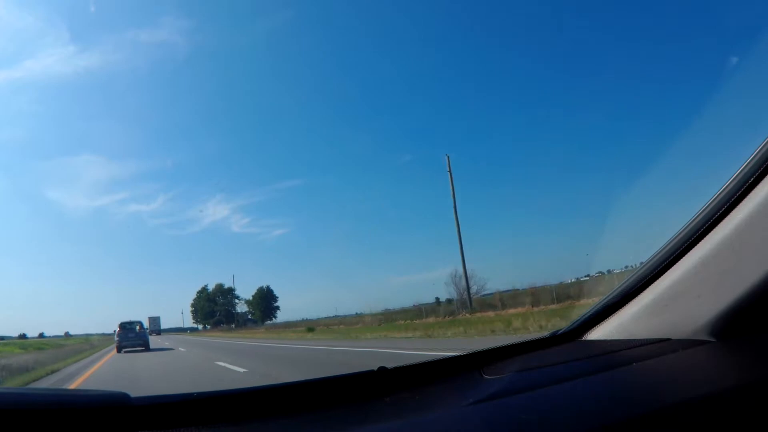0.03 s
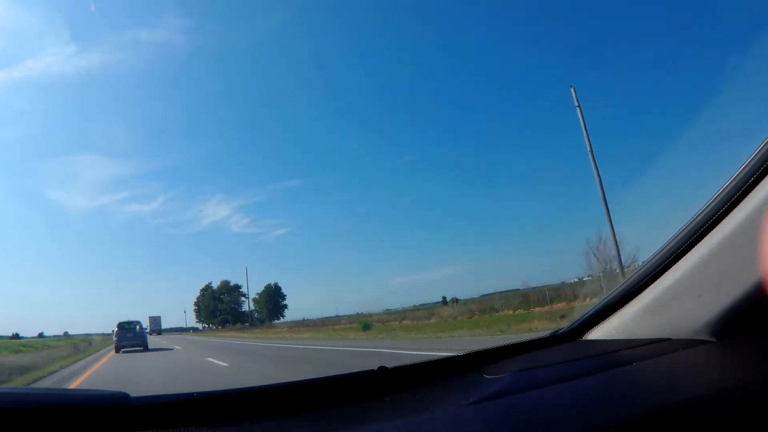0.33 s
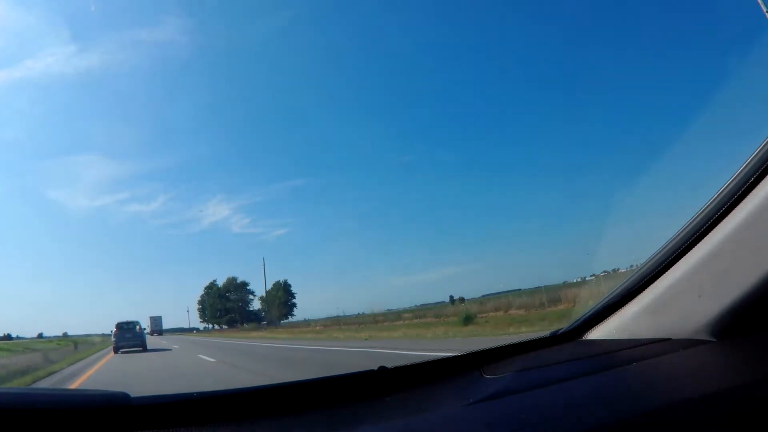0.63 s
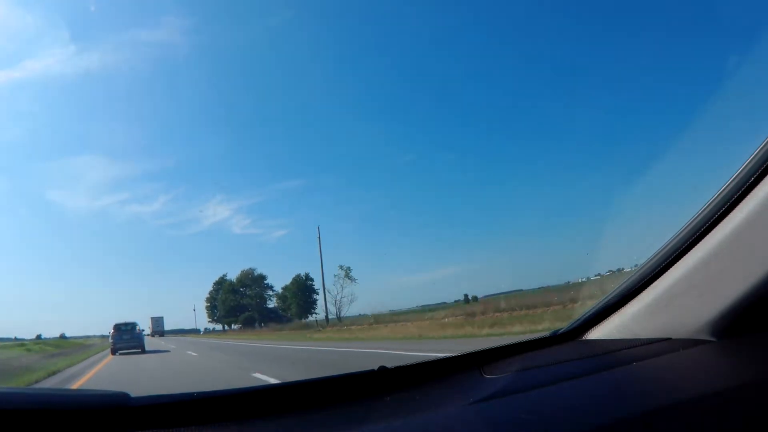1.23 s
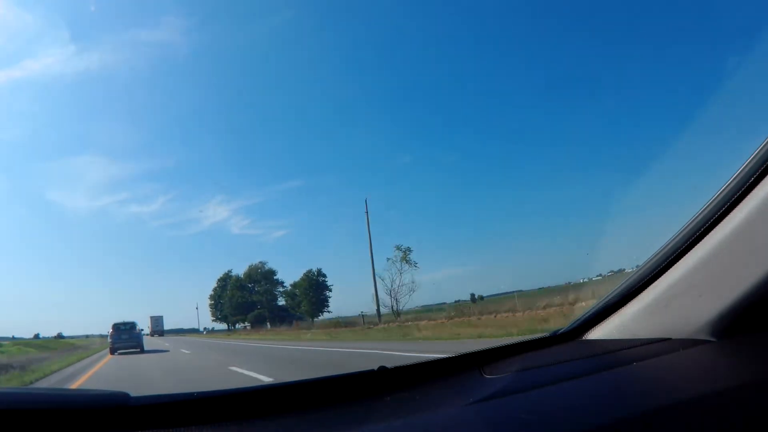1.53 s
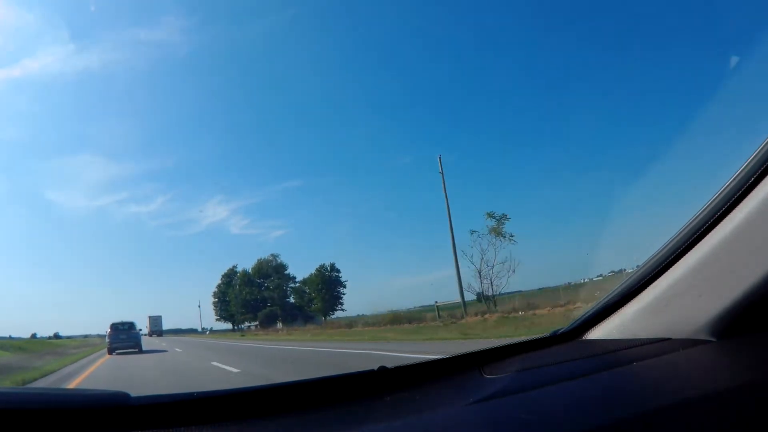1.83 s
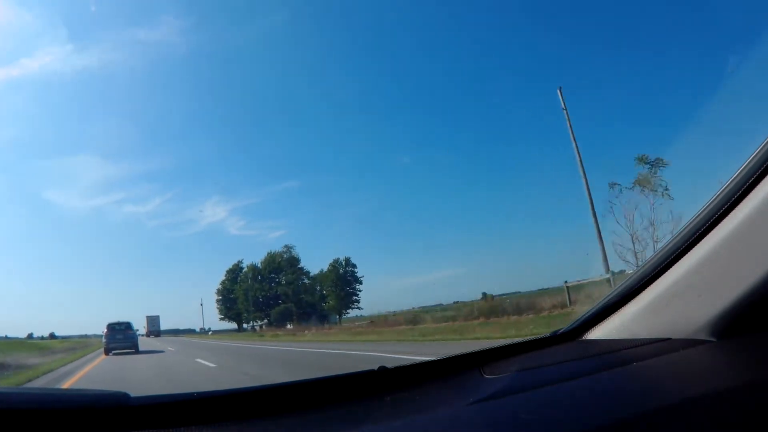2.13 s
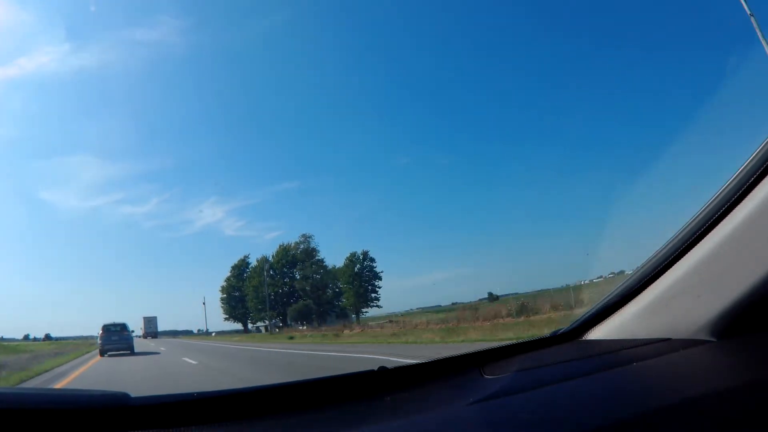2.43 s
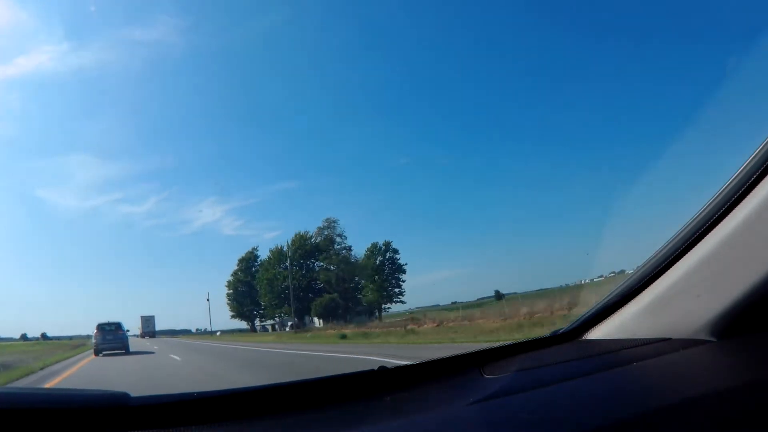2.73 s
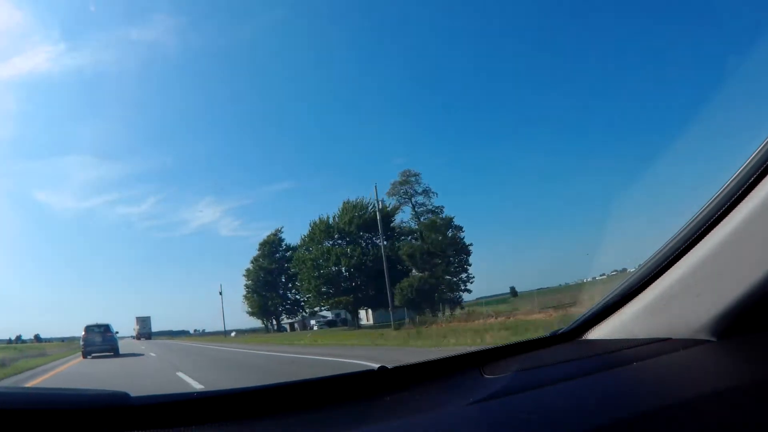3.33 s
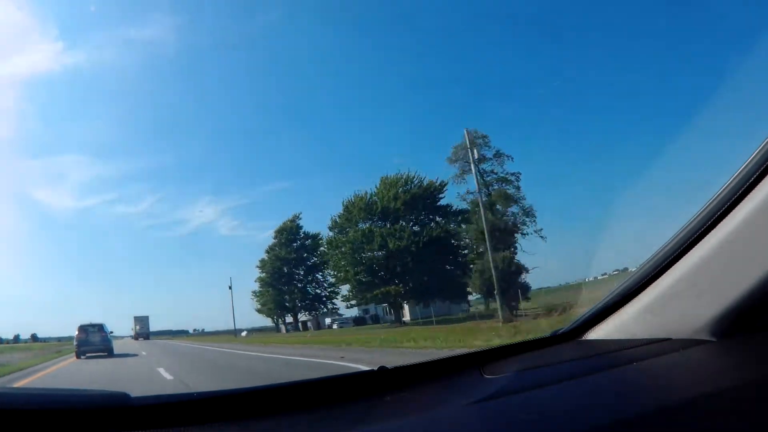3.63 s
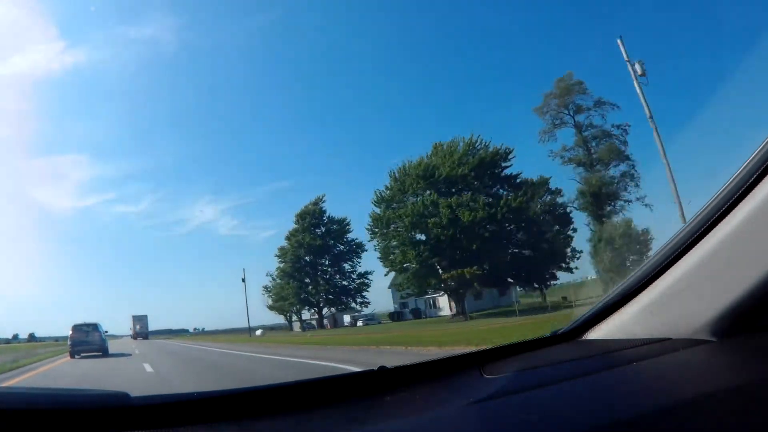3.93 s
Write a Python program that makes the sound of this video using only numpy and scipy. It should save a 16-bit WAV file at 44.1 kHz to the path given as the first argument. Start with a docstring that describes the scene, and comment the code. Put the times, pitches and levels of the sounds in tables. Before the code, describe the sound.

Steady road rumble and engine drone inside a car cruising along a highway.

```python
"""Car cabin at cruising speed

On a country highway the rough surface drives the tyres and body into rumble and roar, and wheels throb.
Periodic firing makes a four-cylinder engine drone; it swells under a short push on the throttle.
Plastic near the dashboard rings once from a knock, then ticks and rustles now and then.
Behind it all, gears whine faintly and turbulent air hisses round the glass."""
import sys
import numpy as np
from scipy import signal
from scipy.fft import rfft, irfft, next_fast_len
from scipy.io import wavfile
from scipy.ndimage import map_coordinates

SR = 44100
rng = np.random.default_rng(int(sys.argv[2]) if len(sys.argv) > 2 else 0)


def wav_record(signal):
    """Record a signal, one row per channel, as 16-bit PCM in the file named by sys.argv[1]."""
    frames = np.transpose(np.atleast_2d(signal))
    bounded = np.clip(frames, -1, 1)
    # unit amplitude maps onto the largest positive 16-bit level
    quanta = np.round(bounded * 32767).astype(np.int16)
    wavfile.write(sys.argv[1], SR, quanta)


N = 176400


def amp(db):
    """Amplitude ratio of a level in decibels."""
    return 10 ** (np.asarray(db) / 20)


def curve(rows):
    """Linear interpolation of (t/s, value) points, one value per sample."""
    return np.interp(np.arange(N) / SR, *np.transpose(rows))


def wobble(rate):
    """Slow random modulation: a spline through `rate` Gaussian values a second."""
    return map_coordinates(rng.standard_normal(512), [np.arange(N) * rate / SR], mode="wrap")


def noise(spectrum, size=N, tilt_db=0):
    """White noise shaped by a spectrum, tilted by tilt_db per octave and scaled to rms 1."""
    octave = np.log2(np.fft.rfftfreq(size, 1 / SR) + 1)
    hz, db = np.transpose(spectrum)
    gain = amp(np.interp(octave, np.log2(hz), db) + tilt_db * (octave - np.log2(4000)))
    shaped = irfft(rfft(rng.standard_normal(size)) * gain, size)
    return shaped / np.sqrt(np.mean(shaped ** 2) + 1e-20)


def strike(t, attack, t60):
    """Envelope of a damped vibration: a quick rise, and a decay of 60 dB in t60 seconds."""
    return (1 - np.exp(-t / attack)) * np.exp(-np.log(1000) * t / t60)


def swell(start, length):
    """Half-sine envelope, zero outside its span."""
    return np.sin(np.pi * np.clip((np.arange(N) / SR - start) / length, 0, 1))


def add(out, start, sound):
    """Superpose a sound on `out`, beginning at `start` seconds."""
    part = out[round(start * SR):][:len(sound)]
    part += sound[:len(part)]


# Spectra of body rumble, panel drumming and tread roar: f/Hz, relative level/dB
RUMBLE_SPECTRUM = [(6, -20), (15, -16), (30, 2.5), (48, -4.5), (68, 4.5), (82, -1), (110, 7.5), (135, 2),
                   (165, 3), (200, -11.5), (260, -10.5), (500, -60.5)]
DRUM_SPECTRUM = [(120, -23.5), (200, 3.5), (255, 0), (300, -4.5), (345, -3.5), (400, -10.5), (600, -17),
                 (1200, -62.5)]
ROAR_SPECTRUM = [(150, -21), (350, -1), (500, 2.5), (680, 0.5), (800, -2), (1000, -4), (1270, -3.5),
                 (1440, -6.5), (1570, -4.5), (1700, -12), (2000, -16), (2350, -17.5), (2750, -22.5),
                 (3150, -32), (4500, -76)]
# Envelopes of the rumble and the drumming: t/s, level/dB
RUMBLE_ENVELOPE = [(0, -34), (.25, -27.5), (.65, -27.5), (1.05, -26.5), (1.4, -30), (1.9, -27.5),
                   (2.2, -28), (2.7, -27), (3.2, -28.5), (3.5, -29), (4, -30.5)]
DRUM_ENVELOPE = [(0, -34.5), (.8, -34.5), (1.4, -34), (1.75, -33), (2.1, -36), (3.1, -33.5), (4, -35)]
ROAR_DB = -35.5

def road():
    """Random forced vibration: the changing surface excites the body, its panels and the tyre tread."""
    rumble = amp(curve(RUMBLE_ENVELOPE) + 0.96 * wobble(8.19)) * noise(RUMBLE_SPECTRUM)
    drum = amp(curve(DRUM_ENVELOPE) + 0.21 * wobble(6)) * noise(DRUM_SPECTRUM)
    roar = amp(ROAR_DB + 0.16 * wobble(3.1) + 0.38 * wobble(24.7)) * noise(ROAR_SPECTRUM)
    return rumble + drum + roar


# Engine speed: t/s, speed/rpm
CRANK_SPEED = [(0.0, 3247.0), (0.5, 3242.0), (1.0, 3234.0), (1.5, 3233.0), (2.1, 3233.0), (2.5, 3241.0),
               (3.0, 3252.0), (3.5, 3262.0), (4.0, 3259.0)]
# Engine load: t/s, throttle (about 0 coasting, about 1 pulling)
ENGINE_LOAD = [(0, -.1), (.5, 0), (1, .05), (1.5, .05), (2.05, .25), (2.3, .9), (2.75, 1), (3.15, 1.1),
               (3.45, .95), (3.65, .45), (4, .2)]

def crank():
    """Rotation is the integral of speed: returns the crank's rpm, its turns so far and the throttle."""
    rpm = curve(CRANK_SPEED)
    turns = np.cumsum(rpm) / (60 * SR)
    return rpm, turns, curve(ENGINE_LOAD)


# Engine orders: multiple of crank speed, relative level coasting/dB, relative level pulling/dB
ENGINE_ORDERS = [(1.0, -58, -44), (2.0, -32.7, -29.3), (3.0, -42, -39), (3.5, -47, -47), (4.0, -43.5, -32),
                 (5.0, -51, -49), (5.5, -50, -55), (6.0, -37.5, -31.5), (7.5, -43, -42.5), (8.0, -51, -39),
                 (8.5, -54, -41.5), (9.0, -55, -49.5), (9.5, -53, -51), (10.0, -70, -49), (10.5, -56, -51),
                 (11.5, -59, -50), (12.5, -58, -52), (13.5, -47, -54), (14.0, -61, -59), (15.0, -70, -58)]
# Gain of the orders above the firing frequency: t/s, gain/dB
UPPER_ORDER_GAIN = [(0, -9), (.4, -7), (.65, -1.5), (1.2, 0), (4, 0)]
# Spectrum of the combustion rasp: f/Hz, relative level/dB
RASP_SPECTRUM = [(120, -51), (220, 28.5), (450, 3), (700, -12), (1500, -1), (2800, -20), (4200, -29.5),
                 (7000, -66)]
DRONE_GAIN_DB, CRANK_JITTER_TURNS = -1.5, 0.002
FIRING_ORDER, FIRING_FLUTTER_DB, UPPER_FLUTTER_DB = 2, 1.7, 1
RASP_COAST_DB, RASP_PULL_GAIN_DB, RASP_DEPTH = -49.5, 2.5, 0.7

def engine(turns, throttle):
    """Periodic excitation: two firings a turn give harmonics and a pulsing rasp that grow with load."""
    angle = 2 * np.pi * (turns + CRANK_JITTER_TURNS * wobble(8))
    drone = np.zeros(N)
    for order, coast_db, pull_db in ENGINE_ORDERS:
        # Firing harmonics align as one pulse; the rest, from uneven cylinders, take a random phase.
        phase = rng.uniform(0, 2 * np.pi) * (order % FIRING_ORDER != 0)
        db = coast_db + (pull_db - coast_db) * throttle
        if order > FIRING_ORDER:
            db += curve(UPPER_ORDER_GAIN) + UPPER_FLUTTER_DB * wobble(7)
        else:
            db += FIRING_FLUTTER_DB * wobble(7)
        drone += np.sqrt(2) * amp(db) * np.cos(order * angle + phase)
    rasp = noise(RASP_SPECTRUM) * (1 + RASP_DEPTH * np.cos(FIRING_ORDER * angle))
    return amp(DRONE_GAIN_DB) * drone + amp(RASP_COAST_DB + RASP_PULL_GAIN_DB * throttle) * rasp


# Envelope of the wheel throb: t/s, level/dB
THROB_ENVELOPE = [(0, -34.5), (.8, -36.5), (1.5, -39), (2, -38), (2.4, -35.5), (3.3, -32.5), (4, -33.5)]
THROB_MEAN_HZ, THROB_WANDER_RAD, THROB_FLUTTER_DB = 35.4, 0.17, 1.4

def wheels(turns):
    """Rotational forcing: a deep, uneven throb whose frequency is proportional to road speed."""
    cycles = THROB_MEAN_HZ * N / SR * turns / turns[-1]
    level = amp(curve(THROB_ENVELOPE) + THROB_FLUTTER_DB * wobble(12))
    return np.sqrt(2) * level * np.sin(2 * np.pi * cycles + THROB_WANDER_RAD * wobble(11))


# Modes of the knocked plastic: f/Hz, relative level/dB, T60/s
PLASTIC_MODES = [(1210, 1, 0.0095), (1370, -13, 0.0041), (2830, -34, 0.058), (3770, -34, 0.029),
                 (4500, -27.5, 0.011), (4810, -27, 0.011)]
# Spectrum of the knock's crack: f/Hz, relative level/dB
CRACK_SPECTRUM = [(600, -16), (1700, 2), (3200, 5), (4500, 8), (5700, -21), (6700, -13), (8400, -20),
                  (10000, -35)]
KNOCK_START_S, KNOCK_GAIN_DB, KNOCK_ATTACK_S = 0.0491, -3, 0.00082
CRACK_RELATIVE_DB, CRACK_T60_S = -33, 0.059

def knock():
    """Free vibration: one impact sets the damped modes of hollow plastic ringing, with a noisy crack."""
    out, t = np.zeros(N), np.arange(SR // 10) / SR
    ring = sum(amp(db) * strike(t, KNOCK_ATTACK_S, t60) * np.sin(2 * np.pi * hz * t)
               for hz, db, t60 in PLASTIC_MODES)
    crack = strike(t, KNOCK_ATTACK_S, CRACK_T60_S) * noise(CRACK_SPECTRUM, size=len(t))
    add(out, KNOCK_START_S, amp(KNOCK_GAIN_DB) * (ring + amp(CRACK_RELATIVE_DB) * crack))
    return out


# Ticks of the trim: t/s, level before filtering/dB, attack/s, T60/s, tilt/(dB per octave), cutoff/Hz
TRIM_TICKS = [(.1635, -28, .0004, .016, -4, 14000), (.168, -56, .002, .12, 4, 15000),
              (.208, -50, .0003, .02, -2, 14000), (.238, -49, .002, .05, -1.5, 13000),
              (.3315, -39, .002, .035, -2, 10000), (.335, -52, .001, .05, 6, 18000),
              (.509, -43, .0003, .015, -4, 12000), (2.015, -53, .001, .045, 1, 15000),
              (2.279, -55, .0003, .015, 1, 15000), (2.37, -54, .0003, .015, 0, 14000),
              (2.689, -38, .0003, .014, 6, 6000), (2.717, -53, .001, .03, 2, 13000),
              (2.908, -56, .0003, .015, 3, 15000), (3.012, -55, .0003, .015, 3, 15000),
              (3.067, -54, .0003, .015, 1, 11000), (3.414, -50, .002, .035, 1, 12000),
              (3.768, -55, .0003, .015, 1, 12000)]
# Spectrum of a tick: f/Hz, relative level/dB
TICK_SPECTRUM = [(700, -22), (1600, -3), (2200, -4), (2750, 3), (3250, -9), (3850, -1), (4800, -9),
                 (6800, -13), (8000, -18), (9600, -9), (11000, -14), (12600, -19), (13300, -9),
                 (14200, -19)]

def ticks():
    """Brief transients are broadband: the trim gives dry ticks, some sharp, some soft and scraping."""
    out, t = np.zeros(N), np.arange(SR // 10) / SR
    for start, db, attack, t60, tilt_db, cutoff_hz in TRIM_TICKS:
        tick = amp(db) * strike(t, attack, t60) * noise(TICK_SPECTRUM, size=len(t), tilt_db=tilt_db)
        lowpass = signal.butter(4, cutoff_hz, fs=SR, output="sos")
        add(out, start, signal.sosfilt(lowpass, tick))
    return out


# Tones of gears and belt-driven parts: multiple of crank speed, level coasting/dB, level pulling/dB,
# gain above mean speed/(dB per rpm), phase wander/rad
GEAR_TONES = [(16.5, -63, -55, 0, .4), (20, -61, -55, 0, .4), (32.45, -57.5, -59.5, -.05, 1.1),
              (34.25, -56, -53.5, .17, .45), (39, -69, -67, 0, .8), (41, -69, -66, 0, .7)]
WHINE_FLUTTER_DB = 0.9

def whine(rpm, turns, throttle):
    """Fixed drive ratios tie thin, unsteady tones to the crank; the strongest grows as the revs rise."""
    extra_rpm = rpm - rpm.mean()
    tones = np.zeros(N)
    for multiple, coast_db, pull_db, db_per_rpm, wander in GEAR_TONES:
        db = coast_db + (pull_db - coast_db) * throttle + db_per_rpm * extra_rpm
        level = amp(db + WHINE_FLUTTER_DB * wobble(4.82))
        tones += level * np.sin(2 * np.pi * multiple * turns + wander * wobble(14))
    return np.sqrt(2) * tones


# Spectrum of the wind hiss: f/Hz, relative level/dB
WIND_SPECTRUM = [(1000, 4), (2500, 0.5), (3400, 4), (3950, 8.5), (4500, 1), (5300, -5), (7000, -12.5),
                 (9000, -31), (14000, -38)]
# Envelope of the wind hiss: t/s, level/dB
WIND_ENVELOPE = [(0, -58), (.7, -60.5), (1.6, -58.5), (2.1, -60), (2.45, -57.5), (2.8, -60), (3.22, -59),
                 (3.45, -59.5), (3.82, -57.5), (4, -59)]
# Whistles at a seal: t/s, duration/s, f/Hz, peak level/dB, phase wander/rad
SEAL_WHISTLES = [(1.2, .8, 2960, -69, .8), (1.0, .65, 7830, -81, 3), (1.05, .6, 7580, -83, 3),
                 (1.1, .55, 6750, -83, 2), (2.44, .26, 2850, -58.5, .8), (2.96, .28, 2845, -58.5, .6)]

def wind():
    """Flow noise: turbulent air hisses round the windscreen pillar and at times whistles at a seal."""
    t = np.arange(N) / SR
    air = amp(curve(WIND_ENVELOPE) + 0.7 * wobble(14)) * noise(WIND_SPECTRUM)
    for start, length, hz, db, wander in SEAL_WHISTLES:
        air += amp(db) * swell(start, length) * np.sin(2 * np.pi * hz * t + wander * wobble(54))
    return air


# Rustles of shifting trim: t/s, duration/s, level/dB
TRIM_RUSTLES = [(0.132, 0.32, -65), (3.145, 0.18, -60.5)]
# Spectrum of a rustle: f/Hz, relative level/dB
RUSTLE_SPECTRUM = [(1500, -10), (3000, 7), (6500, -6), (8500, -13), (12000, -18), (15000, -15)]
RUSTLE_CATCH_DB = 1.8

def rustle():
    """Friction noise: plastic parts rub briefly, catching unevenly."""
    rubbing = sum(amp(db) * swell(start, length) for start, length, db in TRIM_RUSTLES)
    return rubbing * amp(RUSTLE_CATCH_DB * wobble(90)) * noise(RUSTLE_SPECTRUM)


def scene():
    """Superposition: the sources add at the front seat, in one channel."""
    rpm, turns, throttle = crank()
    cabin = road() + engine(turns, throttle) + wheels(turns) + knock() + ticks()
    background = whine(rpm, turns, throttle) + wind() + rustle()
    return (cabin + background)[None]


# Spectrum of the microphone's self-noise: f/Hz, relative level/dB
SELF_NOISE_SPECTRUM = [(3000, 3.5), (7500, 2.5), (9000, 0.5), (10000, -1), (13500, -6), (14800, -8.5),
                       (15600, -14)]
SELF_NOISE_DB, BAND_LIMIT_HZ = -71, 15730

def record(dry):
    """Self-noise and band limiting: the microphone adds fine hiss, and the highest treble is cut off."""
    heard = dry + amp(SELF_NOISE_DB) * noise(SELF_NOISE_SPECTRUM)
    size = next_fast_len(N + SR // 2)
    passband = np.fft.rfftfreq(size, 1 / SR) < BAND_LIMIT_HZ
    return irfft(rfft(heard, size) * passband, size)[..., :N]


dry = scene()
out = record(dry)
wav_record(out)
```